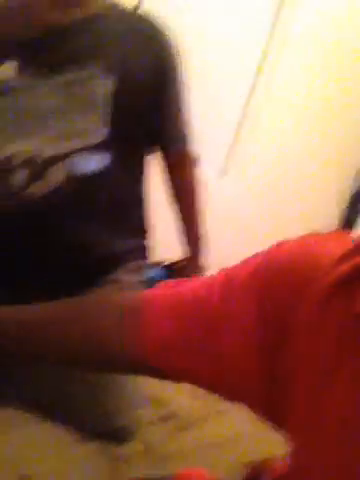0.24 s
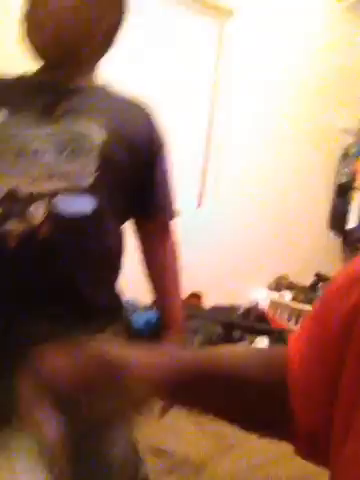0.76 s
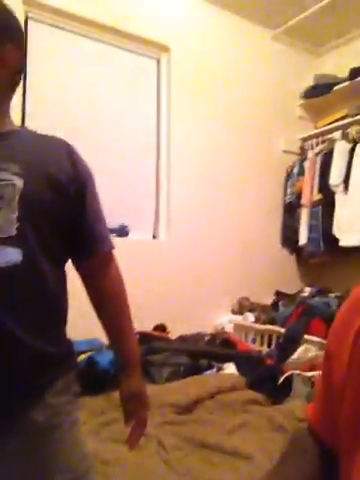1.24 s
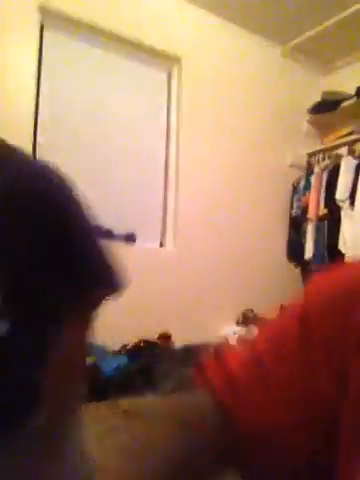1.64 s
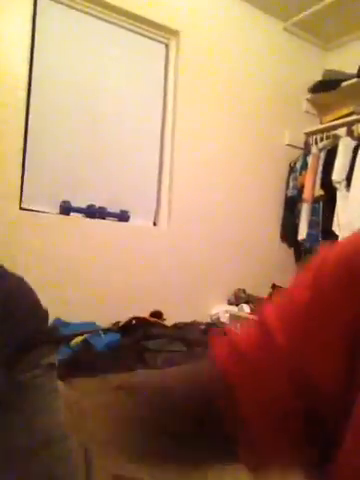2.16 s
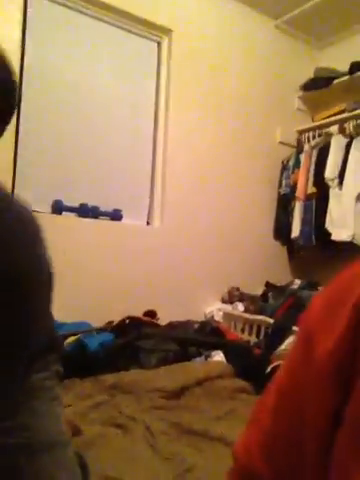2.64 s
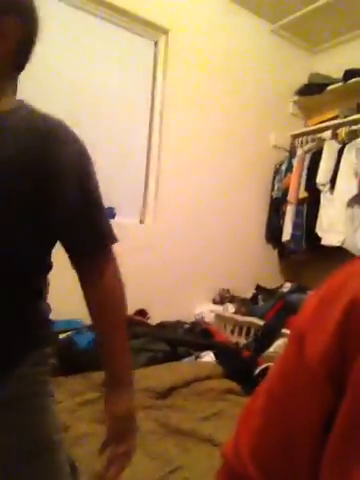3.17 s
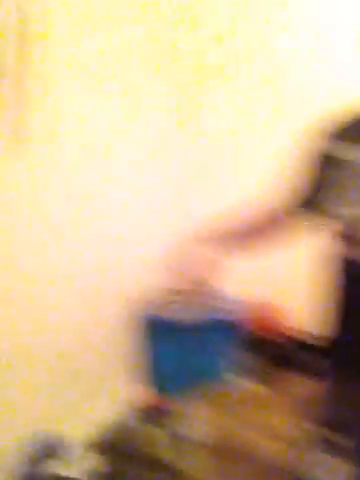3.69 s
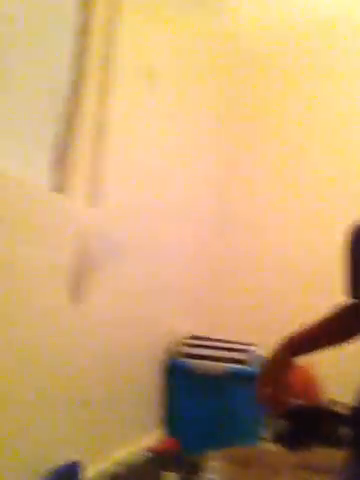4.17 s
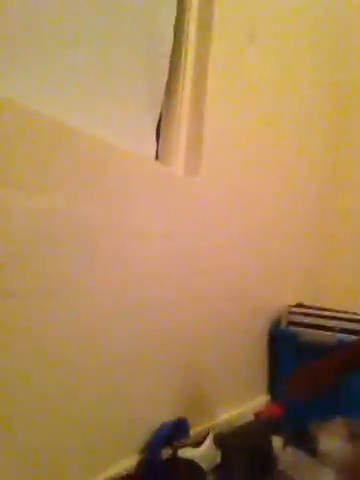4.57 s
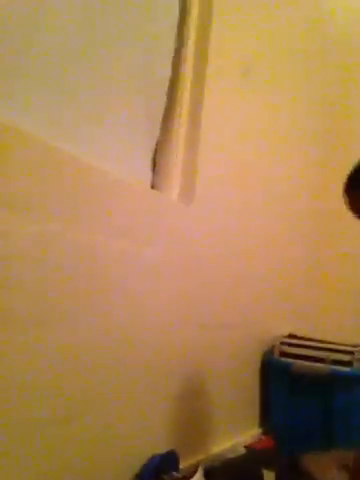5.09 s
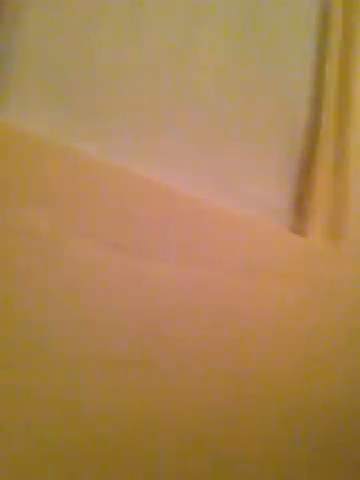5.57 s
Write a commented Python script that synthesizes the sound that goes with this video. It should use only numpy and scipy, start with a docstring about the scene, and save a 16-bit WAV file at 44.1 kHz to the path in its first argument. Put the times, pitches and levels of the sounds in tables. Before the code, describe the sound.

Flipped plastic water bottles land in separate crinkly knocks and thuds in a bedroom, between soft rustles and small close taps.

```python
"""Part-filled plastic bottles flipped in a small bare-walled bedroom, on one hand-held mono camera mic.
Over faint hiss and whine, a bottle first clatters on something hollow that rings. Cloth rustles and
fingers tap the camera, close and dry. From 0.7 s bottles knock and tumble on floor and bed cover:
plastic crinkles, water falls back, the walls answer, and some bottles rock to rest. Near 4 s one
scuffs along into a hard knock; a last tumble follows, then small taps and rustling."""
import sys
import numpy as np
from scipy import signal
from scipy.fft import rfft, irfft
from scipy.io import wavfile

SR = 44100
rng = np.random.default_rng(int(sys.argv[2]) if len(sys.argv) > 2 else 0)


def transcribe(u):
    """Save the signal u as a 16-bit wav file named by the first command-line argument.

    u: samples, shape (n,) or (channels, n), limited to [-1, 1]; the rate is SR.
    q: integer samples, one column per channel.
    """
    v = np.clip(np.atleast_2d(u).T, -1, 1)
    q = np.round(v * 32767).astype(np.int16)
    wavfile.write(sys.argv[1], SR, q)


N = 257014
T = np.arange(int(SR * .6)) / SR  # time within one hit or echo, t/s
FRAME_HZ = np.fft.rfftfreq(8192, 1 / SR)
EDGE_HZ = 15450  # highest frequency heard

# room air and microphone hiss: f/Hz, level/dB
HISS_SPECTRUM = [(18, -68), (30, -44.5), (117, -23), (156, -1.5), (202, -5), (237, -5.5), (307, -9.5),
                 (518, -16), (1330, -19), (9940, -30.5), (13300, -25), (14300, -19.5), (15500, -26)]
# the bedroom's early decay and lingering tail: f/Hz, t60/s
EARLY_DECAY = [(120, 0.34), (240, 0.33), (500, 0.29), (1000, 0.26), (2500, 0.3), (6000, 0.28),
               (14000, 0.24)]
LATE_DECAY = [(120, 0.63), (240, 0.73), (500, 0.96), (1500, 0.73), (4000, 0.76), (14000, 0.39)]
# a bottle's bounces on the hollow object: t/s, ring/dB, knock/dB, crack/dB
BOUNCES = [(0.001, -31.5, -22.5, -37), (0.031, -20, -50.5, -36.5), (0.043, -30.5, -44.5, -52),
           (0.050, -21.5, -27, -41.5), (0.062, -27, -30, -39), (0.097, -22.5, -43, -73.5),
           (0.110, -30, -36.5, -57), (0.146, -27, -47.5, -60)]
# modes of the hollow object, the bottle and the floor: f/Hz, level/dB, t60/s
HOLLOW_MODES = [(622, 1.5, 0.18), (706, -5, 0.26), (784.6, 6, 0.15), (840.3, 6, 0.17), (880, -5, 0.18),
                (940, -9, 0.17), (1205, 0, 0.3), (1338, -0.5, 0.34), (1372, -6.5, 0.35), (1637, -9, 0.31),
                (1888, -12.5, 0.44), (2046, -14.5, 0.27), (2062, -11, .26), (2490, -19, 0.28),
                (2760, -16, .24), (2820, -25, 0.18), (3580, -21.5, .22)]
BOTTLE_MODES = [(565, -2.5, 0.29), (811, 1, 0.21), (1167, -0.5, 0.15), (1294, -12, 0.061),
                (1806, 2.5, 0.17), (1889, 7, .12), (2117, -4.5, 0.29), (2820, -0.5, 0.069),
                (3290, -6, 0.15), (3970, -16, .14)]
FLOOR_MODES = [(156, -7, 0.054), (191.5, -0.5, 0.094), (215, 1, 0.11), (249, -1.5, 0.08), (385, -15, 0.078)]
# spectra of the shell's knock, the thin plastic's crack and slipping cloth: f/Hz, level/dB
KNOCK_SPECTRUM = [(40, -20.5), (100, -26.5), (180, -6), (300, -4.5), (470, -4), (720, 1.5), (1200, 1.5),
                  (2000, -3.5), (3200, -9), (5000, -15.5), (8000, -29), (15000, -44.5)]
CRACK_SPECTRUM = [(100, -38.5), (1200, -15.5), (2800, 1.5), (4500, 2.5), (6500, -2), (9500, -6),
                  (12000, -3.5), (15000, -2)]
CLOTH_SPECTRUM = [(60, -17.5), (220, 6.5), (450, 0.5), (900, -3), (1800, -3.5), (3500, -7.5), (6000, -15.5),
                  (9500, -22.5), (15000, -14.5)]
# clothes and bed cover shifting: peak t/s, level/dB, fall/(dB/s)
CLOTH_MOVES = [(0.79, -57.5, 87), (1.79, -52.5, 30), (2.33, -50, 16), (2.76, -52, 77), (3.35, -50.5, 56),
               (3.748, -51, 98), (4.74, -55.5, 50), (4.97, -54, 22), (5.358, -51.5, 75), (5.54, -56, 118)]
# the cloth's faint stirring between moves: t/s, level/dB
CLOTH_STIR = [(0, -61.5), (1.3, -66), (5.83, -70)]
# taps and plastic snaps close to the microphone: t/s, level/dB, centre f/Hz, width/octaves, t60/s
CLOSE_TAPS = [(0.966, -44.5, 590, 0.65, 0.083), (1.074, -33.5, 4480, 0.52, 0.021),
              (1.677, -47, 1570, 1.1, 0.024), (1.812, -54.5, 3030, 0.13, .03),
              (1.846, -47.5, 1690, 1.15, 0.042), (1.908, -51.5, 596, 0.53, 0.053),
              (1.923, -45, 298, 0.76, 0.06), (1.929, -53.5, 2010, 0.66, .03),
              (2.0676, -31.5, 7500, 0.9, 0.015), (2.072, -34.5, 4000, 2.2, 0.01),
              (2.781, -51.5, 1200, 1.35, 0.061), (3.267, -51.5, 1470, 0.19, 0.057),
              (3.496, -45.5, 215, 0.41, 0.31), (3.557, -57, 765, 0.5, 0.016), (3.671, -55, 3000, 4, 0.013),
              (3.695, -52, 900, 0.6, 0.037), (3.712, -45, 1780, 0.55, 0.027),
              (3.859, -50.5, 970, 0.99, 0.05), (4.468, -46.5, 230, 0.6, 0.094),
              (4.771, -49.5, 780, 0.63, 0.0069), (4.903, -55, 710, 0.66, 0.023),
              (5.019, -47.5, 776, 0.42, 0.012), (5.115, -41, 348, 0.43, 0.24), (5.114, -60, 6000, 3, 0.06),
              (5.607, -58.5, 646, 1.06, 0.027)]
# bottle impacts: t/s, shell knock/dB, floor thud/dB, crack/dB, ring/dB re knock, floor pitch factor
IMPACTS = [ (0.711, -49.5, -51, -79, -8, 1.14), (0.732, -57, -59, -54, -2, 1.1),
           (0.995, -25, -33, -34, -19, 1.08), (1.006, -22.5, -27, -29.5, -8, 1.175),
           (1.018, -24, -35, -37.5, -21, 1.45), (1.046, -22.5, -34.5, -30, -16, 1.27),
           (1.074, -26.5, -40, -31.5, -7, 1.05), (1.527, -32.5, -36, -40.5, -10, 0.84),
           (1.535, -33, -35, -49, -11, 1.6), (1.549, -38, -33, -37, -3, 0.92),
           (2.0687, -35, -41.5, -33.5, -6.5, 1.06), (2.251, -40.5, -51, -52.5, -26, 0.86),
           (2.368, -34.5, -58, -41.5, -5.5, .8), (2.392, -33, -38, -43, -18, 0.92),
           (2.424, -28.5, -37.5, -40.5, -10, 0.79), (2.446, -35.5, -32.5, -44.5, -11, 0.89),
           (2.606, -32.5, -33.5, -47, -19, 1.3), (2.657, -33.5, -41, -50, -15, 1.16),
           (2.686, -37, -40, -48.5, -7.5, 1.07), (3.0549, -25.5, -33, -31, 2.5, 1.17),
           (3.063, -29, -21, -33.5, -17, 1.106), (3.959, -20, -28, -32.5, -6.5, 0.936),
           (4.074, -33, -28, -39.5, -8.5, 1.12), (4.110, -32, -42.5, -45.5, -12.5, 1),
           (4.483, -31, -30.5, -34, -31, 0.85), (4.493, -33, -28, -33.5, -24, 1.12),
           (4.521, -29, -37.5, -36.5, -5.5, 0.98), (4.532, -36, -37, -40.5, -9, 1.2),
           (4.629, -41.5, -43, -59, -4, 1.23), (5.326, -55.5, -59, -50.5, 0, 1.25)]
# bottles rocking to rest: first bump t/s, thud/dB, loss per bump/dB
ROCKS = [(1.678, -40, 2.5), (3.13, -42, 20), (4.165, -57, 9), (4.69, -47, 5.5)]


def amp(db):
    """Decibels to gain."""
    return 10 ** (np.asarray(db) / 20)


def value_at(points, hz):
    """A table's value at hz, on a log-frequency axis."""
    f, value = np.transpose(points)
    return np.interp(np.log(hz + 1), np.log(f + 1), value)


def unit_rms(x):
    """Scales to rms 1."""
    return x / np.sqrt(np.mean(x ** 2) + 1e-20)


def at_level(x, db):
    """Gives a hit the energy of 25 ms of sound at this level."""
    return amp(db) * x / np.sqrt(np.sum(x ** 2) / (.025 * SR) + 1e-20)


def add(mix, s, sound):
    """Mixes a sound in at time s."""
    part = mix[max(round(s * SR), 0):][:len(sound)]
    part += sound[:len(part)]


def through(x, response):
    """Convolution, cut to the length of x."""
    return signal.fftconvolve(x, response)[:len(x)]


def click(gain_db):
    """A minimum-phase pulse with the given spectrum."""
    log_gain = np.log(amp(np.maximum(gain_db, -90)))
    mirrored = np.r_[log_gain, log_gain[-2:0:-1]]
    spectrum = np.exp(np.conj(signal.hilbert(mirrored)))
    return np.fft.ifft(spectrum).real[:len(gain_db) // 2]


def ring(modes, spread_db, detune, pitch=1, scatter=1):
    """Dying sines, a little different at each blow. Without scatter they all start from rest."""
    hz, db, t60 = np.transpose(modes)[:, :, None]
    size, shift, turn = rng.standard_normal((3, len(modes), 1))
    phase = 2 * np.pi * (pitch * hz * (1 + detune * shift) * T + scatter * turn)
    decay = np.exp(-np.log(1000) * T / t60)
    return (amp(db + spread_db * size) * decay * np.sin(phase)).sum(0)


def noise(points):
    """Steady noise of a given spectrum, rms 1."""
    gain = amp(value_at(points, np.fft.rfftfreq(N, 1 / SR)))
    return unit_rms(irfft(rfft(rng.standard_normal(N)) * gain, N))


def wander(per_s):
    """A slow or fast random curve, rms 1."""
    t = np.arange(N) / SR
    knots = np.arange(0, t[-1] + 1, 1 / per_s)
    return unit_rms(np.interp(t, knots, rng.standard_normal(len(knots))))


def noise_floor(hiss_db=-67.5, whine_hz=14230, whine_db=-77, drift_hz=45, fuzz_hz=70):
    """Quiet room air and microphone hiss, with the camera's thin, wavering electronic whine."""
    pitch = whine_hz + drift_hz * wander(per_s=9) + fuzz_hz * wander(per_s=400)
    whine = unit_rms(np.sin(2 * np.pi * np.cumsum(pitch) / SR))
    return amp(hiss_db) * noise(HISS_SPECTRUM) + amp(whine_db) * whine


def bedroom(linger_db=-21, grain=0.56, build_s=0.0014):
    """The bare walls' answer from one spot: uneven echoes, each band dying at its own speed; energy 1."""
    sign, size = rng.standard_normal((2, len(T)))
    hz, t, bands = signal.stft(sign * np.exp(grain * size), SR, nperseg=256)
    early = np.exp(-np.log(1000) * t / value_at(EARLY_DECAY, hz)[:, None])
    late = np.exp(-np.log(1000) * t / value_at(LATE_DECAY, hz)[:, None])
    tail = signal.istft(bands * np.hypot(early, amp(linger_db) * late), SR)[1][:len(T)]
    tail *= 1 - np.exp(-T / build_s)
    return tail / np.linalg.norm(tail)


def to_mic(walls, direct_db):
    """The straight path to the microphone, then the walls; more direct sound is heard as closer."""
    return walls + amp(direct_db) * (T == 0)


def clatter(ring_room_db=-5, radiate_hz=560):
    """Quick bounces keep the hollow object ringing; the walls blur its tones."""
    out = np.zeros(N)
    shell = click(value_at(KNOCK_SPECTRUM, FRAME_HZ))
    plastic = click(value_at(CRACK_SPECTRUM, FRAME_HZ) - FRAME_HZ / 3000)  # softer contact, less treble
    radiate = signal.butter(4, radiate_hz, "high", fs=SR, output="sos")  # weak below the lowest mode
    for s, ring_db, knock_db, crack_db in BOUNCES:
        walls = bedroom()
        path = to_mic(walls, direct_db=-10.5)
        tone = signal.sosfilt(radiate, ring(HOLLOW_MODES, spread_db=2.8, detune=0.0014, scatter=0))
        tone = at_level(tone + amp(ring_room_db) * through(walls, tone), ring_db)
        knock = at_level(through(path, shell), knock_db)
        crack = at_level(through(path, plastic), crack_db)
        add(out, s, tone + knock + crack)
    return out


def movement_db(rise_db_per_s=112):
    """How strongly the cloth moves: each move swells and dies away above a faint stirring."""
    t = np.arange(N) / SR
    moves = [db - np.maximum(rise_db_per_s * (s - t), fall * (t - s)) for s, db, fall in CLOTH_MOVES]
    stir = np.interp(t, *np.transpose(CLOTH_STIR))
    return np.max(moves + [stir], axis=0)


def rustle(trim_db=-0.5, clump_db=1.5, grain_db=2, catch_db=-7, catches_per_s=60, cycles=4.2, pitches=24):
    """Cloth near the microphone slips in a soft hiss; tiny catches each tick at their own pitch."""
    hiss = noise(CLOTH_SPECTRUM)
    flicker_db = clump_db * wander(per_s=30) + grain_db * wander(per_s=870)
    hiss = unit_rms(hiss * amp(flicker_db))
    catches = np.zeros(N)
    for hz in np.geomspace(250, 3600, pitches):
        train = (rng.random(N) < catches_per_s / pitches / SR) * rng.uniform(0.47, 1, N)
        catches += through(train, tick(hz, cycles, db=0))
    catches = unit_rms(through(catches, to_mic(bedroom(), direct_db=-4)))
    return amp(movement_db() + trim_db) * (hiss + amp(catch_db) * catches)


def tick(hz, cycles, db):
    """A tiny release rings as a sine, falling to 1/e in this many cycles."""
    return at_level(np.sin(2 * np.pi * hz * T) * np.exp(-T * hz / cycles), db)


def tap(db, hz, width, t60, skirt_db=-32, room_db=-13):
    """A close click and brief scuff, coloured by the piece of plastic that gives way."""
    touch = (T == 0) + .55 * rng.standard_normal(len(T)) * np.exp(-np.log(1000) * T / t60)
    octaves = np.log2((FRAME_HZ + 1) / hz)
    colour = np.exp(-.5 * (octaves / width) ** 2) + amp(skirt_db) / (1 + abs(octaves))
    direct = through(touch, click(20 * np.log10(colour)))
    return at_level(direct + amp(room_db) * through(bedroom(), direct), db)


def handling(faint_per_s=6, faint_db=-3, faint_hz=1300, scatter_octaves=0.84):
    """Clear taps and snaps at the microphone, and faint random finger taps that follow the movement."""
    out, level_db = np.zeros(N), movement_db()
    for s, db, hz, width, t60 in CLOSE_TAPS:
        add(out, s, tap(db, hz, width, t60))
    for at in np.flatnonzero(rng.random(N) < faint_per_s / SR):
        hz = faint_hz * 2 ** (scatter_octaves * rng.standard_normal())
        add(out, at / SR, tap(level_db[at] + faint_db, hz, width=0.57, t60=0.025))
    return out


def landings(crinkle_db=-6, slosh_s=0.07, slosh_db=-20):
    """Each landing crinkles the plastic; the water then falls back with a second, softer thud."""
    out = np.zeros(N)
    for s, knock_db, thud_db, crack_db, ring_db, floor_pitch in IMPACTS:
        add(out, s, impact(knock_db, thud_db, crack_db, ring_db, floor_pitch))
        add(out, s, at_level(crinkle(), crack_db + crinkle_db))
        add(out, s + slosh_s * rng.uniform(0.66, 1.2), amp(thud_db + slosh_db) * thud(floor_pitch))
    return out


def impact(knock_db, thud_db, crack_db, ring_db, floor_pitch, middling_db=-27.5):
    """Out in the room, the shell knocks and rings, thin plastic cracks and the floor thuds."""
    octaves = np.log2(np.clip(FRAME_HZ, 300, 5000) / 1200)
    tilt = max(0.33 * (knock_db - middling_db), -3)  # dB/octave: a harder blow is shorter, so brighter
    shell = click(value_at(KNOCK_SPECTRUM, FRAME_HZ) + tilt * octaves)
    plastic = click(value_at(CRACK_SPECTRUM, FRAME_HZ))
    knock = at_level(through(to_mic(bedroom(), direct_db=-15.5), shell), knock_db)
    tone = at_level(ring(BOTTLE_MODES, spread_db=0, detune=0.0036), knock_db + ring_db)
    crack = at_level(through(to_mic(bedroom(), direct_db=-14), plastic), crack_db)
    return knock + tone + crack + amp(thud_db) * thud(floor_pitch)


def thud(floor_pitch, rise_s=0.0062, room_db=-4):
    """The water's weight thumps the floor, at 0 dB; the pitch depends on the spot."""
    floor = ring(FLOOR_MODES, spread_db=3.5, detune=0.048, pitch=floor_pitch, scatter=0)
    floor *= 1 - np.exp(-T / rise_s)
    echo = at_level(through(bedroom(), floor), room_db)
    return at_level(at_level(floor, 0) + echo, 0)


def crinkle(count=5, gap_s=0.016, centre_hz=3100, octaves=0.5, spread_db=4, fade_db_per_s=170):
    """The bottle's dented wall pops back in a few short, weakening ticks."""
    out, s = np.zeros(len(T)), 0
    for pitch, size, wait in rng.standard_normal((count, 3)):
        hz = min(centre_hz * 2 ** (octaves * pitch), EDGE_HZ)
        add(out, s, tick(hz, cycles=16, db=spread_db * size - s * fade_db_per_s))
        s += gap_s * abs(wait)
    return out


def rocking(count=4, first_gap_s=0.058, gap_shrink=0.52):
    """Soft bumps come ever sooner and weaker until the fallen bottle lies still."""
    out = np.zeros(N)
    for s, first_db, loss_db in ROCKS:
        for k in range(count):
            db = first_db - k * loss_db
            bump = impact(knock_db=db - 10.5, thud_db=db, crack_db=db - 17, ring_db=-4, floor_pitch=0.96)
            add(out, s, bump)
            s += first_gap_s * gap_shrink ** k
    return out


def slide(start_s=3.91, end_s=3.959, onset_s=0.017, squeak_db=-5):
    """A bottle scuffs along a surface, louder and louder, until it strikes."""
    t = np.arange(N) / SR
    gate = np.clip((t - start_s) / onset_s, 0, 1) * (t < end_s)
    push = amp(np.interp(t, [start_s, end_s], [-57, -37])) * gate
    modes = ring(BOTTLE_MODES, spread_db=1, detune=.005)
    squeak = unit_rms(through(rng.standard_normal(N), modes))  # friction keeps the modes sounding
    scuff = push * (noise(KNOCK_SPECTRUM) + amp(-2) * noise(CRACK_SPECTRUM) + amp(squeak_db) * squeak)
    return through(scuff, to_mic(bedroom(), direct_db=0)) / np.sqrt(2)


def scene():
    """Everything reaches one hand-held microphone, the same on both channels."""
    mono = landings() + rocking() + clatter() + slide() + rustle() + noise_floor() + handling()
    return np.array([mono, mono])


def record(dry, low_cut_hz=125):
    """The sound is thin in the deep bass and stops above about 15 kHz."""
    thin = signal.sosfilt(signal.butter(2, low_cut_hz, "high", fs=SR, output="sos"), dry)
    high_cut = signal.firwin(511, EDGE_HZ, window=("kaiser", 8), fs=SR)
    return signal.oaconvolve(thin, high_cut[None], "same", axes=1)


dry = scene()
out = record(dry)
transcribe(out)
```